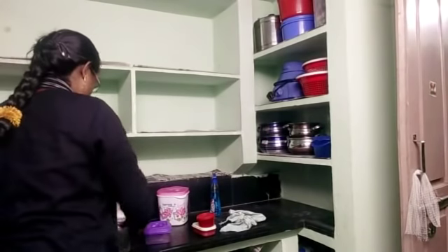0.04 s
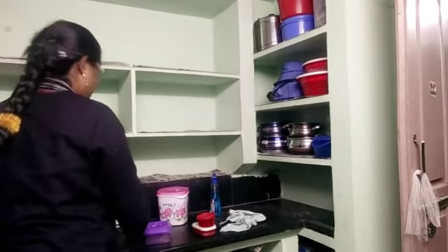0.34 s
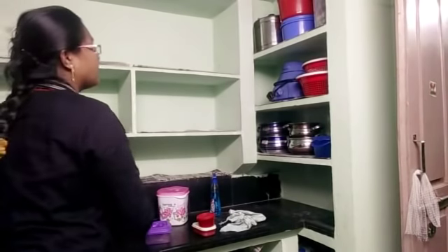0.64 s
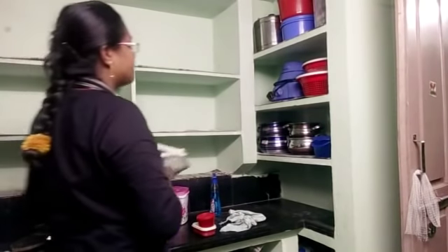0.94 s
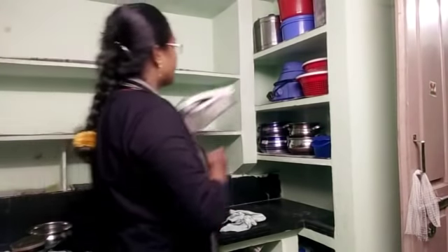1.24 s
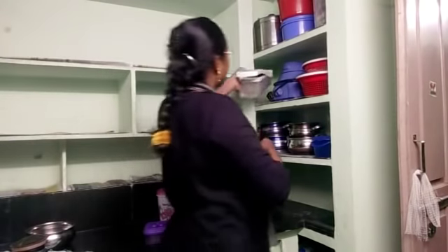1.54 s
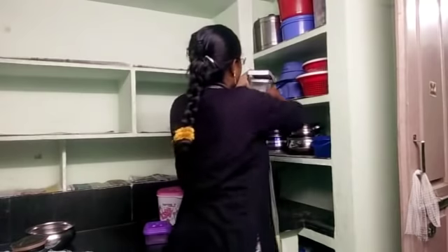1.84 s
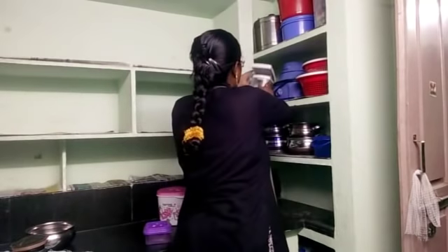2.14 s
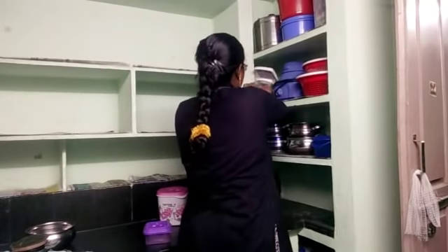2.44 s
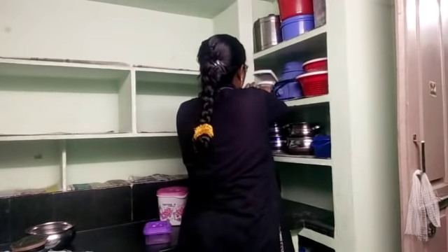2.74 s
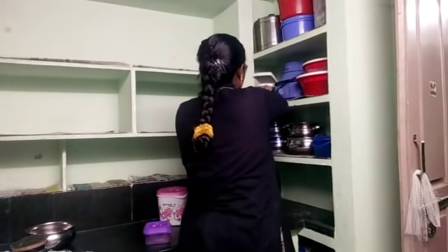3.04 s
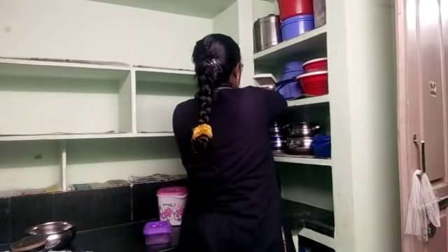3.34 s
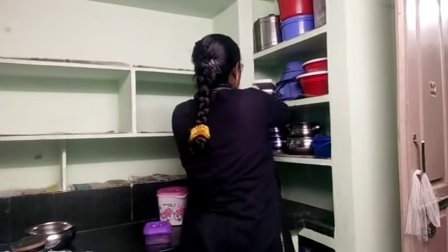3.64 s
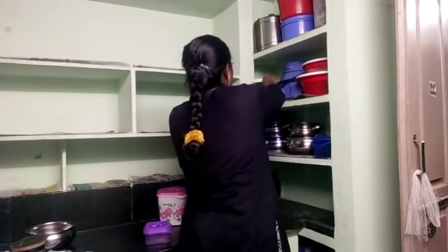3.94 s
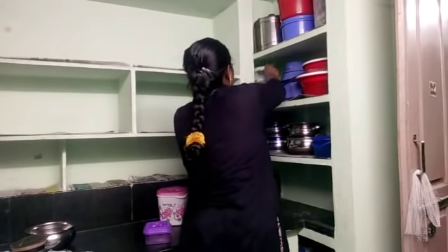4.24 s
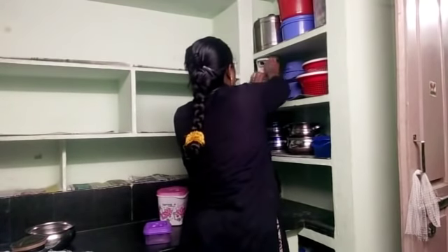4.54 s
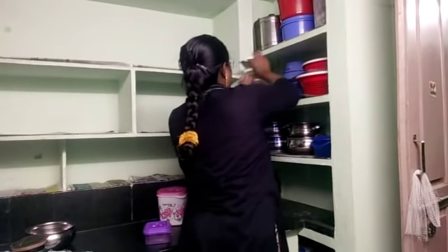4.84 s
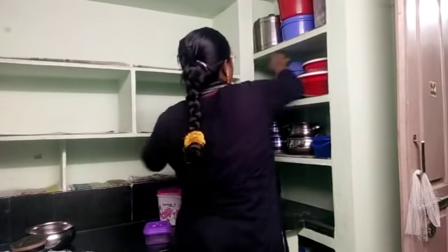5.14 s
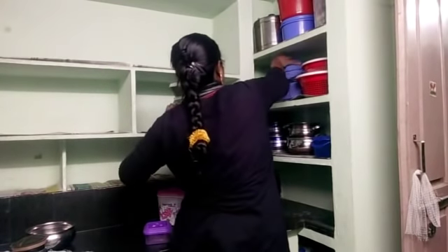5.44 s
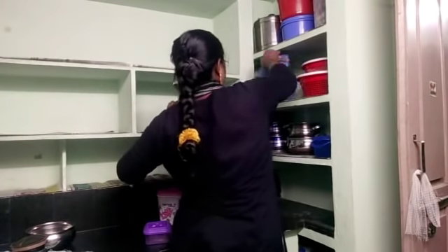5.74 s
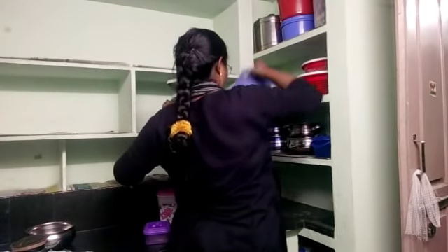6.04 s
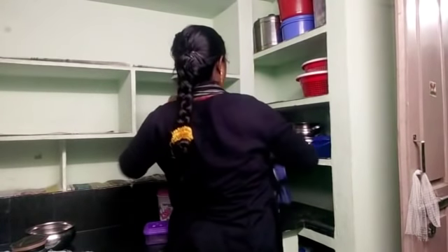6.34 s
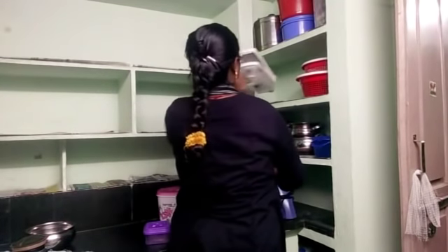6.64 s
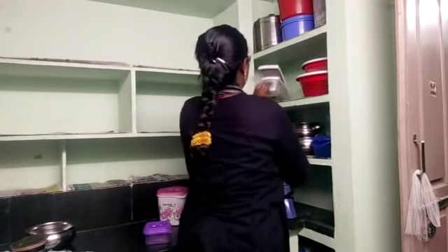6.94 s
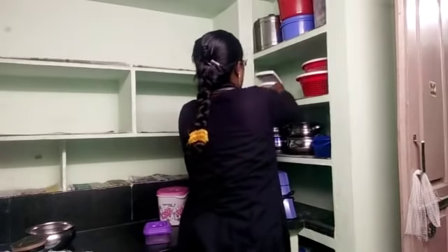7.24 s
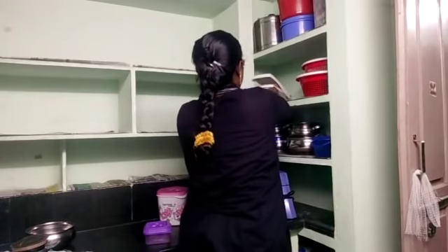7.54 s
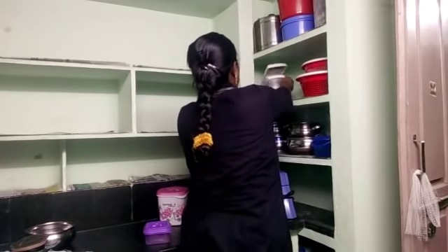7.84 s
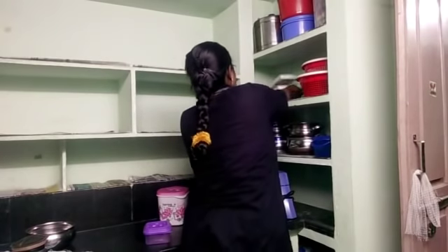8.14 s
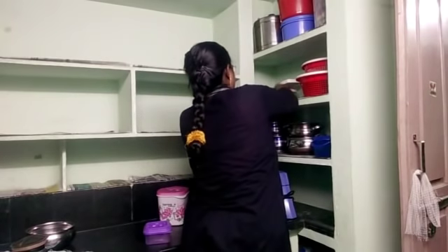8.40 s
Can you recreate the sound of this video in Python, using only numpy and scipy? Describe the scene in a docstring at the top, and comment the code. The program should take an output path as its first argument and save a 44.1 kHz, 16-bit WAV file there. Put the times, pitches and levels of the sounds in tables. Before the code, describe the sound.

In the first half second, a plastic box scrapes across a stone counter with a few clacks. A lull follows, with only faint sleeve rustle. From about 1.8 to 3.3 seconds the box taps and clicks lightly on a masonry shelf among pots and tubs. The loudest sound, one sharp knock, lands at about 3.6 seconds. A busy cluster of clacks and short scrapes runs from 4.3 to 4.7 seconds. Near 5.4 seconds a tub gives a faint, brief squeak as it is pulled out, followed by soft taps and rustling. A second box knocks at 6.6 seconds, again around 7.3 and 7.5, then slides and clatters into place from 8.1 to 8.5 seconds. The contacts ring briefly in the shelf niche and the small kitchen. Soft clothing rustle accompanies the movements over a very faint steady room noise.

```python
"""In a small kitchen, plastic boxes are dragged off a stone counter, carried and pushed onto a masonry
shelf among pots and tubs. Each impact excites the damped modes of box and support, and the shelf niche
and the room reverberate. Sliding friction drives the same modes as a scrape, and a tub squeaks by
stick-slip as it is pulled out. Sleeves rustle, some movements raise a low hollow note, and a faint
steady noise lies under it all."""
import sys
import numpy as np
from scipy import signal
from scipy.fft import rfft, irfft, next_fast_len
from scipy.io import wavfile
from scipy.ndimage import uniform_filter1d, map_coordinates

SR = 44100
rng = np.random.default_rng(int(sys.argv[2]) if len(sys.argv) > 2 else 0)


def master_out(mix):
    """Clip the mix to full scale and print it as 16-bit PCM to the path in sys.argv[1]."""
    frames = np.transpose(np.atleast_2d(mix))
    ceiling = np.clip(frames, -1, 1)
    pcm = np.round(ceiling * 32767).astype(np.int16)
    wavfile.write(sys.argv[1], SR, pcm)


N = 377937
TIME = np.arange(N) / SR
LIFT_OFF_S, SECOND_BOX_S = 1.0, 6.5  # the first box leaves the counter; the second is taken up

# Spectra of midrange rustle, low shuffle and very high hiss: frequency_hz, relative_db
RUSTLE_SPECTRUM = [(400, -26.5), (590, -4), (740, -14), (880, -2.5), (1030, -16), (1170, -4), (1330, -10),
                   (1750, -1), (2100, -1.5), (2700, -6), (4000, -14), (4700, -14), (6000, -22.5),
                   (9000, -35)]
SHUFFLE_SPECTRUM = [(25, -17.5), (62, -2.5), (95, -15), (118, 1.5), (145, -2), (200, -2), (260, 0.5),
                    (380, -1), (600, -19.5), (900, -29)]
HISS_SPECTRUM = [(3000, -31.5), (6000, -7), (9000, -7.5), (12000, -1.5), (15000, 2)]


def amp(db):
    """Amplitude ratio of a level in decibels."""
    return 10 ** (np.asarray(db) / 20)


def unit(x):
    """Normalisation to rms 1."""
    return x / np.sqrt(np.mean(x ** 2) + 1e-20)


def along(points, hz):
    """Interpolation of (frequency_hz, value) points on a logarithmic frequency axis."""
    f, values = np.transpose(points)
    return np.interp(np.log(hz + 1), np.log(f + 1), values)


def wobble(knots_per_s):
    """Smooth random modulation: a spline through Gaussian values."""
    return map_coordinates(rng.standard_normal(int(N * knots_per_s / SR) + 4), [TIME * knots_per_s])


def filtered(x, response):
    """Linear filtering: the spectrum of x times a frequency response."""
    size = next_fast_len(len(x) + SR // 4)
    return irfft(rfft(x, size) * response(np.fft.rfftfreq(size, 1 / SR)), size)[:len(x)]


def causal(gain):
    """Minimum-phase response with this gain: nothing sounds before the excitation."""
    cepstrum = irfft(np.log(np.maximum(gain, 1e-6)))
    half = len(cepstrum) // 2
    cepstrum[1:half] *= 2
    cepstrum[half + 1:] = 0
    return np.exp(rfft(cepstrum))


def resonance(f, hz, width_hz):
    """Response of a damped oscillator, with gain 1 at its natural frequency."""
    return 1j * f * width_hz / (hz * hz - f * f + 1j * f * width_hz)


def noise(spectrum):
    """White noise shaped to a spectrum, at rms 1."""
    return unit(filtered(rng.standard_normal(N), lambda f: amp(along(spectrum, f))))


def narrow_noise(hz, width_hz):
    """Narrow-band noise: white noise through two like resonators."""
    return filtered(rng.standard_normal(N), lambda f: resonance(f, hz, width_hz) ** 2)


def add(track, start_s, sound):
    """Superposition of a sound on the track."""
    part = track[max(round(start_s * SR), 0):][:len(sound)]
    part += sound[:len(part)]


def envelopes(movements, swell_s=0.07, settle_s=0.077):
    """One gain curve per level column: movements swell, hold and decay, and their powers add."""
    power = 0
    for start_s, length_s, *levels_db in movements:
        swell = np.sin(np.pi / 2 * np.clip((TIME - start_s) / swell_s, 0, 1)) ** 2
        settle = np.exp(-np.clip((TIME - start_s - length_s) / settle_s, 0, 20))
        power = power + np.outer(amp(levels_db), swell * settle) ** 2
    return np.sqrt(power)


def reverberation(niche_t60_s, build_s, room_db=-23):
    """Diffuse reflections decay exponentially, fast in the niche and slower in the room; energy 1."""
    # Reverberation time of the kitchen: frequency_hz, t60_s
    room_decay = [(120, 0.96), (500, 0.44), (1500, 0.45), (4000, 0.36), (12000, .22)]
    t = np.arange(SR // 2) / SR
    niche = rng.standard_normal(len(t)) * amp(-60 * t / niche_t60_s)
    hz, age_s, bands = signal.stft(rng.standard_normal(len(t)), SR, nperseg=256)
    decay = amp(-60 * age_s / along(room_decay, hz)[:, None])
    room = signal.istft(bands * decay, SR, nperseg=256)[1][:len(t)]
    build_up = 1 - np.exp(-t / max(build_s, 1 / SR))
    spectrum = rfft((niche + amp(room_db) * room) * build_up)
    power = uniform_filter1d(uniform_filter1d(abs(spectrum) ** 2, size=70), size=70)
    tail = irfft(spectrum / causal(np.sqrt(abs(power))))  # bare walls return every band alike
    return tail / np.linalg.norm(tail)


def room_tone(whine_db=-85.5, midrange_db=-76.5, rumble_db=-83.5, hiss_db=-90):
    """Stationary noise of the still kitchen: three broad bands and a faint narrow whine."""
    whine = amp(whine_db) * unit(narrow_noise(hz=2051, width_hz=60))
    midrange = amp(midrange_db) * noise(RUSTLE_SPECTRUM)
    rumble = amp(rumble_db) * noise(SHUFFLE_SPECTRUM)
    hiss = amp(hiss_db) * noise(HISS_SPECTRUM)
    return whine + midrange + rumble + hiss


def hollow_note():
    """A low resonance, driven by noise, swells with some of the movements."""
    # Swells of the note: start_s, length_s, level_db
    swells = [(.09, 0.086, -70), (3.68, 0.093, -70), (5.72, 0.39, -77), (6.57, 0.31, -63)]
    analytic = signal.hilbert(narrow_noise(hz=172, width_hz=11))
    note = np.real(analytic) / np.sqrt(abs(analytic) + 1e-12)  # its level wavers only mildly
    return envelopes(swells)[0] * unit(note)


def scuffs(count=260, spread_db=4, centre_hz=2300, width_hz=1100, t60_s=0.16, rise_s=0.0039):
    """Friction transients: fingers and cloth catch on plastic, each tick in its own band; rms 1."""
    track, t = np.zeros(N), np.arange(SR // 8) / SR
    starts_s = rng.uniform(0, N / SR, count)
    centres_hz = centre_hz * np.exp(0.3 * rng.standard_normal(count))
    levels_db = spread_db * rng.uniform(-0.75, 1, count)
    for start_s, hz, level_db in zip(starts_s, centres_hz, levels_db):
        burst = rng.standard_normal(len(t)) * amp(-60 * t / t60_s) * (1 - np.exp(-t / rise_s))
        tick = filtered(burst, lambda f: resonance(f, hz, width_hz) ** 2)
        add(track, start_s, amp(level_db) * tick)
    return unit(track)


def sleeves(grain_db=2.0, rub_db=2.56, flicker_db=2.5, patchy_db=3.5):
    """Modulated noise: each arm movement rustles by friction and shuffles low, and a thin hiss swells and fades
    along with it."""
    # Arm movements: start_s, length_s, rustle_db, shuffle_db, hiss_db
    movements = [(.15, 0.24, -59, -82, -71), (.52, .2, -71, -87, -79.5), (.88, 0.48, -76, -95, -83),
                 (1.42, 0.058, -80, -84, -70), (1.83, 0.39, -76, -88, -89),
                 (2.25, 0.28, -69.5, -78.5, -71.5), (2.58, 0.14, -64, -69, -71),
                 (3.12, 0.24, -73, -86, -91), (3.5, 0.2, -65.5, -66.5, -85.5), (4.0, 0.63, -63.5, -81, -78),
                 (4.33, 0.42, -69, -71.5, -101), (4.85, 0.416, -76, -87, -95.5),
                 (5.26, 0.31, -67.5, -78.5, -73), (5.53, 0.41, -64, -73, -75), (5.92, 0.31, -65, -76, -111),
                 (6.19, 0.69, -60.5, -70, -80), (6.39, 0.49, -67.5, -74, -65.5),
                 (6.88, 0.31, -64, -81, -76), (7.14, 0.51, -66.5, -75.5, -70), (7.7, 0.33, -70, -84, -84),
                 (8.06, 0.46, -66.5, -82, -67.5)]
    rustle_gain, shuffle_gain, hiss_gain = envelopes(movements)
    shuffle = amp(1.5 * wobble(34)) * noise(SHUFFLE_SPECTRUM)
    folds = amp(grain_db * wobble(120) + rub_db * wobble(22)) * noise(RUSTLE_SPECTRUM)
    reflections = signal.fftconvolve(folds, reverberation(niche_t60_s=0.065, build_s=0.0026))[:N]
    hiss = amp(flicker_db * wobble(55) + patchy_db * wobble(19)) * noise(HISS_SPECTRUM)
    rustle = unit(folds + 0.36 * reflections) + 0.41 * scuffs()
    return rustle_gain * rustle + shuffle_gain * shuffle + hiss_gain * hiss


def tub_squeak(start_s=5.322, end_s=5.447, pitch_hz=930, ramp_s=0.012, jitter=0.013):
    """Stick-slip oscillation: a tub being pulled out slips almost periodically, giving harmonics."""
    # Partials of the squeak at its source: harmonic_number, level_db
    partials = [(1, -60.5), (3, -74), (4, -72), (5, -80), (6, -64.5), (7, -64), (8, -58), (9, -75),
                (10, -74.5), (11, -75), (12, -76), (13, -81), (14, -78), (16, -77)]
    slip_hz = pitch_hz * (1 + jitter * wobble(400))
    phase = 2 * np.pi * np.cumsum(slip_hz) / SR
    pull = np.clip((TIME - start_s) / ramp_s, 0, 1) * np.clip((end_s - TIME) / ramp_s, 0, 1)
    fundamental, *overtones = [np.sqrt(2) * pull * amp(db) * np.sin(k * phase) for k, db in partials]
    shrill = sum(overtones)
    reflections = signal.fftconvolve(shrill, reverberation(niche_t60_s=0.24, build_s=0.004))[:N]
    return fundamental + 0.13 * shrill + 0.97 * reflections


def touch_colour(f, depth_db=3.5, spacing_hz=420, full_above_hz=2400):
    """The point of excitation decides which high modes answer: a random spectral ripple."""
    ripple = map_coordinates(rng.standard_normal(128), [f / spacing_hz], mode="mirror")
    return amp(depth_db * ripple * np.clip(f / full_above_hz, 0, 1) ** 2)


def box_modes(f, start_s, spread_db=2.0, detune=0.0064):
    """Modal response of box and support; each new grip shifts the modes' pitch and strength a little."""
    # Modes of a box on the counter, in the shelf niche, and of each box: pitch_hz, width_hz, gain_db
    on_counter = [(175, 16, -1), (272, 14, -13), (360, 25, -9.5), (616, 81, -9.5), (663, 10, -2),
                  (880, 25, 5), (963, 27, -4.5), (1169, 91, 3.5), (1493, 135, 1.5), (1890, 100, 3),
                  (2180, 86, -5), (2310, 83, -1), (2860, 770, -7.5), (3570, 190, -3.5), (3960, 180, -5.5)]
    on_shelf = [(170, 14, -14.5), (269, 12, -18.5), (308, 6, -17), (714, 4.7, -18), (879, 15, -8.5),
                (935, 37, -5), (1136, 22, -1), (1230, 38, 1.5), (1340, 34, -4.5), (1424, 40, 1.5),
                (1511, 35, 0.5), (1567, 17, -3), (1720, 45, 2.5), (1802, 69, -4), (1876, 92, -1.5),
                (1998, 39, 0.5), (2140, 160, -4.5), (2320, 120, -7.5), (2440, 70, -5.5), (2410, 35, -6.5),
                (2663, 27, -1), (2788, 60, -5.5), (3037, 110, -7), (3120, 13, -7.5), (3470, 77, -11),
                (3710, 19, -8.5), (3890, 27, -7), (4360, 230, -13.5)]
    first_box = [(374.7, 16, -5.5), (534, 16, -5), (559.4, 22, 2), (610.6, 15, -1)]
    second_box = [(373, 7.5, -4), (562, 31, -2.5), (593, 23, -1), (622, 16.3, 4), (620, 17.4, -9),
                  (1407, 40, 1), (1863, 58, -1), (3180, 78, -3.5)]
    box = first_box if start_s < SECOND_BOX_S else second_box
    modes = on_counter if start_s < LIFT_OFF_S else on_shelf + box
    peaks = []
    for hz, width_hz, gain_db in modes:
        gain_shift, pitch_shift = rng.standard_normal(2)
        mode = resonance(f, hz * (1 + detune * pitch_shift), width_hz)
        peaks.append(amp(gain_db + spread_db * gain_shift) * abs(mode))
    return np.linalg.norm(peaks, 3, axis=0)  # where modes overlap, the strongest dominates


def box_response(f, start_s, knock_db, clack_db, tick_db, wall_hz, wall_db, wall_q=20):
    """Transfer function of a contact: modes and an unpitched crack, weighted by the kind of touch."""
    # Spectrum of the unpitched crack: frequency_hz, gain_db
    crack_spectrum = [(100, -32), (300, -29.5), (750, -46.5), (1300, -20), (3500, -9.5), (6000, -21),
                      (10000, -28.5), (15500, -26)]
    modes = box_modes(f, start_s)
    crack = amp(along(crack_spectrum, f)) * touch_colour(f)
    # The touched wall of the box rings most.
    wall = 1 + amp(wall_db) * abs(resonance(f, wall_hz, wall_hz / wall_q)) ** 2
    # A soft, heavy touch knocks, a hard one ticks; a small box radiates little bass.
    tilt = [(90, knock_db - 13), (250, 0.67 * knock_db), (550, knock_db), (650, knock_db),
            (1100, 0.2 * min(knock_db, 0)), (2300, 0.0014),
            (3400, clack_db), (5000, clack_db), (8500, tick_db)]  # frequency_hz, gain_db
    return causal(np.hypot(modes, crack) * wall * amp(along(tilt, f)))


def box_slides(slips_per_s=1000, catch_db=4.5):
    """Sliding friction: many tiny slips, random in time and uneven in force, excite the box's modes."""
    # Sliding strokes: start_s, length_s, level_db, knock_db, tick_db, wall_hz, wall_db
    strokes = [(0.0, 0.017, -51.5, -1, 8.5, 1403, 7.5), (0.132, .098, -53, -15.5, -3.5, 1520, 18.5),
               (0.248, 0.085, -36.5, -4, -6.5, 1420, 1), (.371, 0.07, -42, 2, -19, 827, 6),
               (0.541, 0.061, -52.5, -22, 8.5, 1725, 20), (1.168, 0.019, -60, -20, -7, 1970, 17),
               (1.411, 0.037, -68, -12, -3, 3360, 25), (1.904, .025, -56, -8, 0, 2900, 12),
               (2.372, 0.073, -53, -20, 7.5, 1970, 11), (2.917, 0.042, -51.5, 24, -13, 1750, 14),
               (3.141, .025, -44, -14.5, 11, 2065, 28.5), (3.531, .026, -44.5, 0, -3.5, 1860, 11),
               (3.764, 0.05, -59.5, -5.5, 18.5, 945, 23), (4.018, .16, -56, -29.5, 13.5, 2030, 14.5),
               (4.181, 0.055, -51, -11, 0, 1720, 11), (4.342, 0.035, -31, -1.5, -2, 1610, -1),
               (4.518, 0.12, -40.5, 13.5, -9.5, 2720, 12), (4.636, .046, -46, 13, -5, 2800, 7),
               (4.923, 0.03, -56, 32, -14, 1240, 7.5), (5.617, 0.054, -51, -2, 22.5, 2060, -16),
               (5.799, 0.067, -54.5, 2, -26, 3640, 12), (5.845, 0.11, -55.5, 0, -5, 1460, -18),
               (6.299, 0.81, -63, -2, 1, 4580, 17), (7.283, 0.019, -59, -5, 22, 2000, -6),
               (7.422, 0.032, -51.5, 6, 4.5, 7540, 8), (8.082, 0.096, -42, -1, -21, 1860, -8),
               (8.199, 0.058, -49.5, -3, -24, 1650, 8), (8.395, 0.081, -50, -28, 11.5, 2100, 15)]
    track, t = np.zeros(N), np.arange(SR // 2) / SR
    catching = amp(catch_db * wobble(70))
    for start_s, length_s, level_db, knock_db, tick_db, wall_hz, wall_db in strokes:
        stroke = np.sin(np.pi * np.clip(t / length_s, 0, 1))
        slips = (rng.random(len(t)) < slips_per_s / SR) * rng.choice([-1, 1], len(t))
        force = slips * stroke * np.roll(catching, -round(start_s * SR))[:len(t)]
        rub = signal.fftconvolve(force, reverberation(niche_t60_s=0.1, build_s=0.0016))[:len(t)]
        scrape = filtered(rub, lambda f: box_response(f, start_s, knock_db, 0, tick_db, wall_hz, wall_db))
        add(track, start_s, amp(level_db) * unit(scrape) * np.sqrt(np.mean(stroke ** 2)))
    return track


def box_impacts(graze_db=-19, graze_s=0.005, t60_s=0.12, light_db=-28, stiffening=0.074, crest_db=13.5):
    """Impulse excitation: a box grazes, lands and rings into the niche; strong blows build up faster."""
    # Impacts: start_s, nominal_peak_db, knock_db, hardness_db, wall_hz, wall_db
    impacts = [(.202, -31, -14, -18, 1440, 0), (.23, -29.5, -18, -5, 2510, 12.5),
               (.359, -20, 2.5, 0.5, 2420, 16), (.416, -31.5, 10, 0, 1830, 8),
               (.574, -35, 4.5, -27, 1248, 17.5), (1.322, -47, 3.5, -10, 1820, 21),
               (1.7758, -27, -4.5, -26.5, 2850, 9), (1.799, -34.5, -2, -20, 1224, 9),
               (1.876, -44.5, -14, -9, 1690, -7), (1.931, -31.5, 5.5, -6.5, 1190, 5),
               (2.17, -46.5, -24, -33, 1668, 22), (2.255, -49, -18, 2, 1630, 27),
               (2.322, -36, 8, -16, 1753, 8), (2.461, -34.5, 10, -10, 1600, 3),
               (2.498, -33.5, -11, -7, 1850, -14), (2.611, -35.5, 9.5, -11, 1700, 3),
               (2.671, -23, 0, 1.5, 2180, 11), (2.677, -22, -20, -6, 1580, 10.5),
               (2.756, -35.5, 13, -12, 2050, -7), (2.952, -41, 3, -13.5, 1770, -17),
               (3.133, -43, 19, -12, 2000, 1), (3.158, -35, -26, 16, 2090, 12),
               (3.257, -40.5, 6, 4, 2030, 12), (3.281, -32, 14.5, 0, 1640, 14),
               (3.301, -37.5, -10, 6, 1940, 3), (3.428, -48, 10.5, -13, 1247, 4),
               (3.559, -8, 1.5, 2, 1620, 6), (3.681, -39, 18, -5.5, 1786, 12),
               (4.187, -40, 1.5, -17, 2060, 2.5), (4.284, -32.5, -0.5, -11, 2620, 16),
               (4.351, -28.5, 4.5, -4, 1520, 5), (4.374, -16.5, -15, 3, 1640, 9),
               (4.379, -19, 3.5, -1.5, 2140, 12), (4.431, -25, 9, 1, 1197, 9),
               (4.526, -23, 9, -6, 2030, -1), (4.549, -29.5, 3, -17, 1170, 13),
               (4.574, -31, 26, 5, 1444, 2), (4.595, -26.5, 18, -3, 1486, 17.5),
               (4.674, -37.5, 3, -17.5, 1330, 12), (4.729, -37, 16.5, -24, 1950, -6),
               (4.887, -43, 13, -13.5, 1210, 3), (4.932, -43, 11.5, -21, 1182, 15.5),
               (5.135, -49.5, -10, -7, 1755, 2), (5.566, -51, 10, 0, 1870, 0),
               (5.727, -45.5, -1, -22, 1242, 5), (5.864, -35, -4, -6, 2240, 0),
               (5.929, -37.5, 0, -18, 2090, 6), (6.301, -45.5, -3, -26, 2210, 15),
               (6.576, -23.5, -5.5, -8, 1079, 23), (6.78, -41.5, -3, -26, 1454, 7),
               (7.303, -25.5, 6.5, -5.5, 1520, 5), (7.481, -29.5, 11, -16, 1850, 4),
               (7.505, -21.5, 10, 1.5, 7750, 13.5), (7.667, -36, 19, -4, 1478, 14),
               (7.826, -41.5, 7.5, -27, 2060, 16), (7.852, -40, -33, -3.5, 2710, 12.5),
               (8.083, -25.5, 8, 0.5, 2060, 4), (8.123, -29, 7.5, -6, 1690, -9),
               (8.197, -30.5, 6, -16, 1720, 14), (8.237, -29.5, 12, -40, 1610, 5),
               (8.304, -34, -22, 36, 1870, 18), (8.367, -18.5, 0, 3.5, 1830, 6),
               (8.475, -29.5, -32, 9, 2066, 26.5), (8.511, -38, -18, -2, 1840, 8)]
    track = np.zeros(N)
    for start_s, peak_db, knock_db, hardness_db, wall_hz, wall_db in impacts:
        build_s = 0.0017 * amp(-stiffening * max(peak_db - light_db, 0))
        landing = reverberation(t60_s, build_s)
        graze = amp(graze_db) * reverberation(t60_s, build_s)
        blow = graze + np.pad(landing, (round(graze_s * SR), 0))[:len(landing)]
        clack_db = 0.52 * hardness_db  # hardness acts fully on the tick, partly on the clack below
        ring = filtered(
            blow, lambda f: box_response(f, start_s, knock_db, clack_db, hardness_db, wall_hz, wall_db))
        onset_rms = np.std(ring[:SR // 40])
        add(track, start_s - graze_s, amp(peak_db - crest_db) * ring / onset_rms)
    return track


def scene():
    """Superposition: the pressures of all sources add at one point."""
    return (box_impacts() + box_slides() + tub_squeak() + sleeves() + hollow_note() + room_tone())[None]


def record(dry):
    """Band limiting: an ideal low-pass filter removes the highest treble."""
    cutoff_hz = 15650
    return np.array([filtered(channel, lambda f: f < cutoff_hz) for channel in dry])


dry = scene()
out = record(dry)
master_out(out)
```